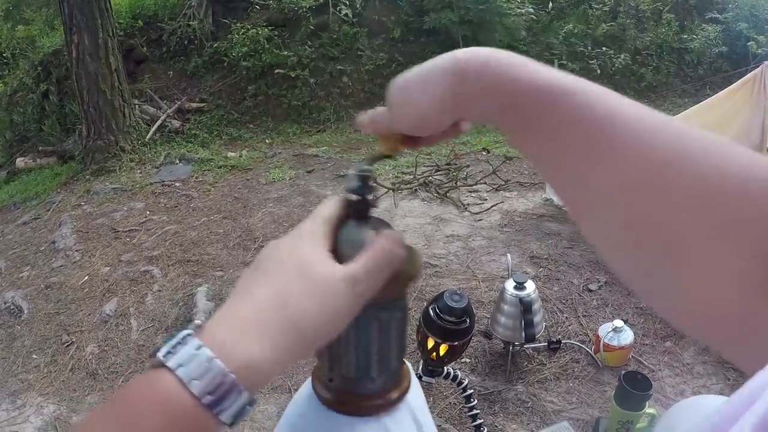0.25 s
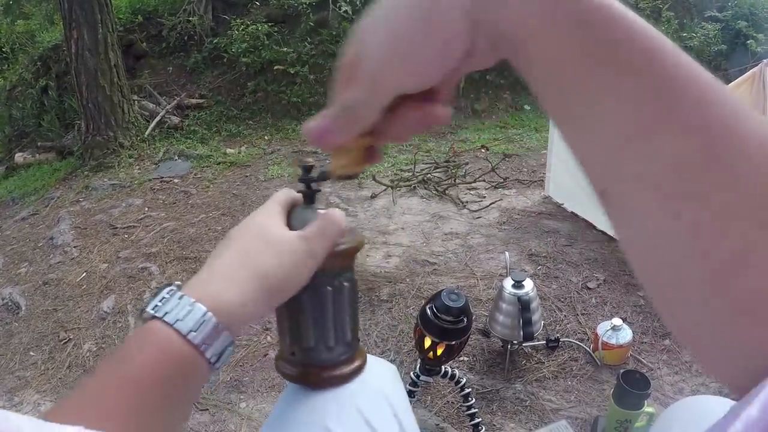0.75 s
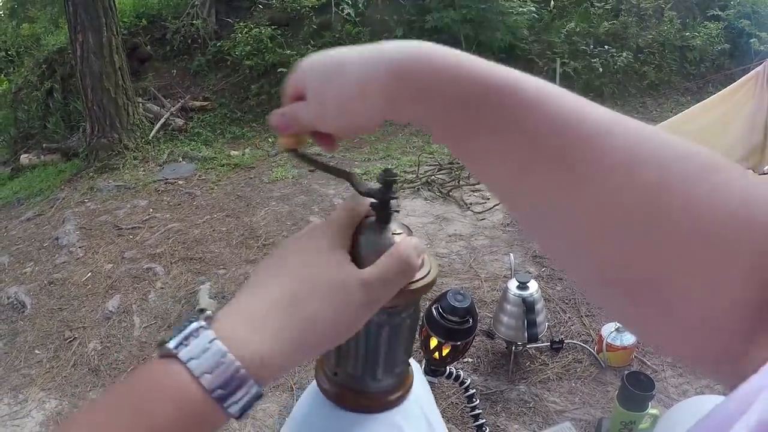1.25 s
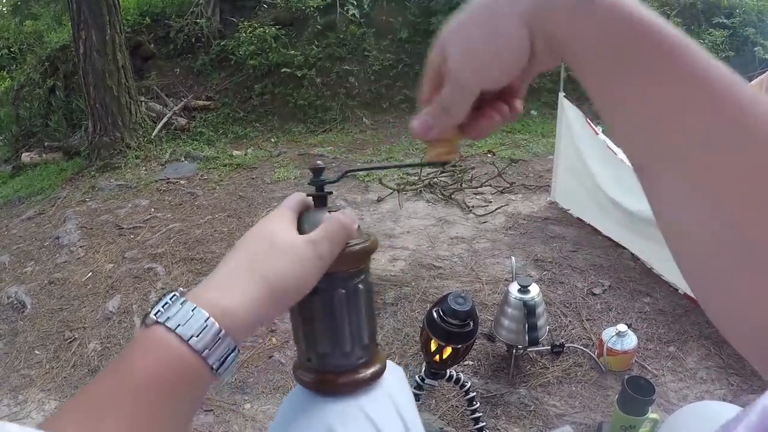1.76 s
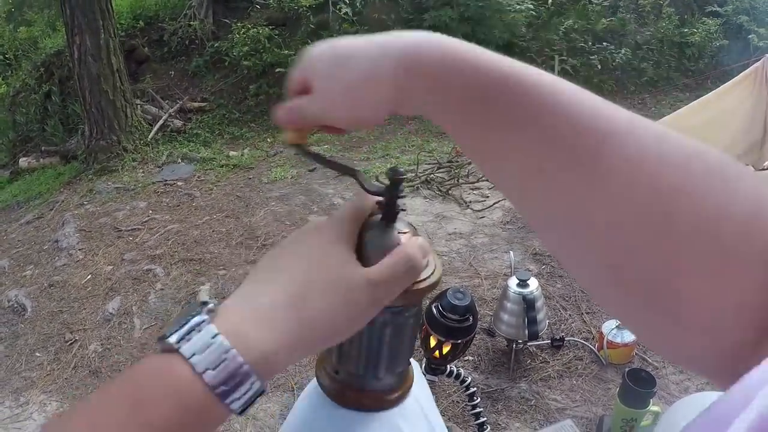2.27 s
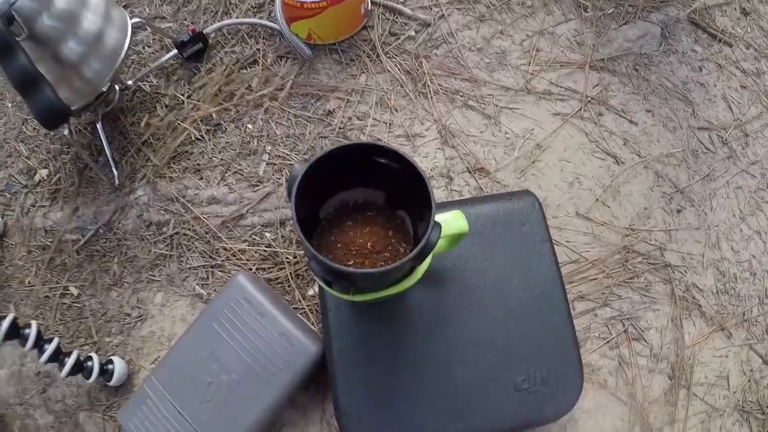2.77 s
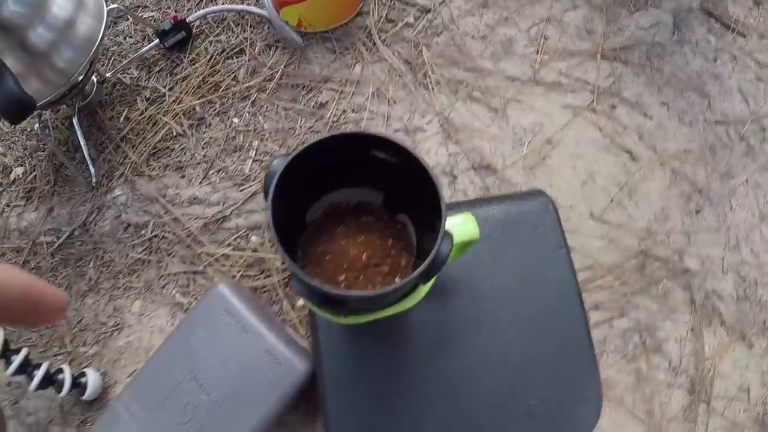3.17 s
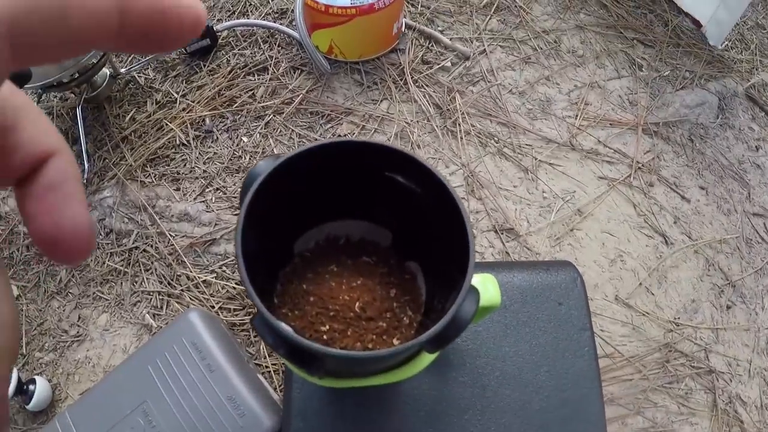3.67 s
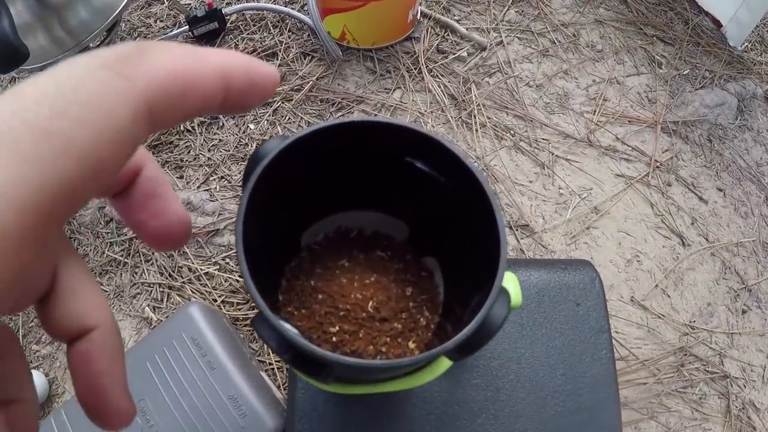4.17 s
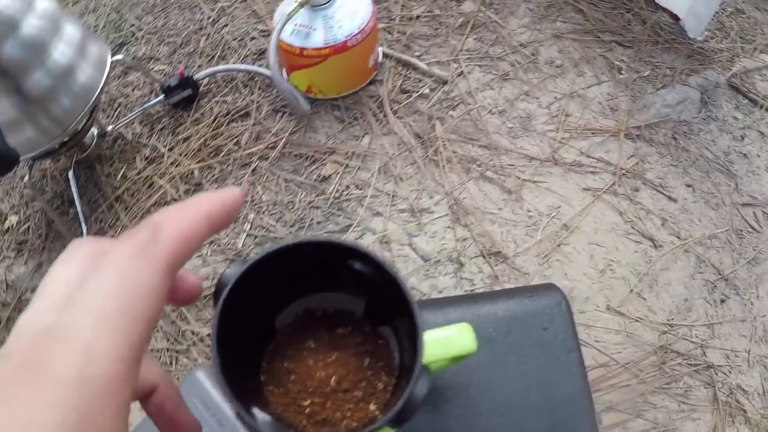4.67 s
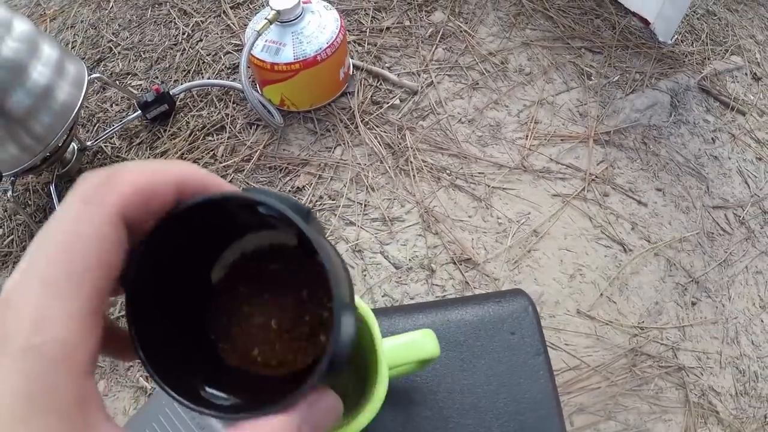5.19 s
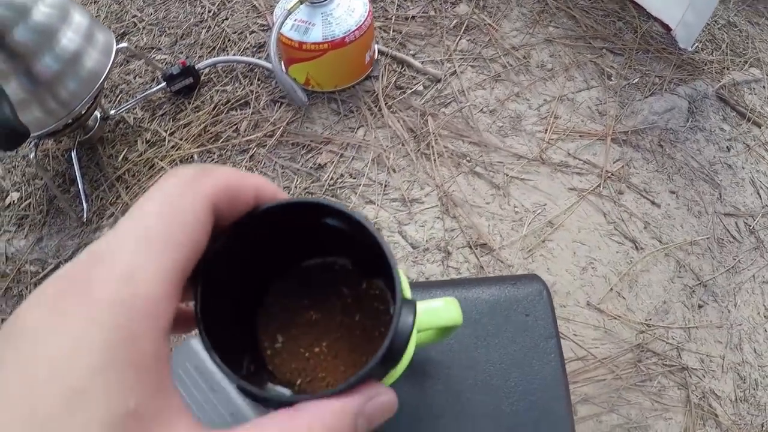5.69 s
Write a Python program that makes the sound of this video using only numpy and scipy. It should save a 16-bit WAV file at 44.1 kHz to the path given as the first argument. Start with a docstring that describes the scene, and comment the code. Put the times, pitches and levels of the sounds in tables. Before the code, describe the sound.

From 0 to 2.6 seconds a hand-cranked coffee mill works right at the microphone, loud and dry. Irregular crunching surges with the arm pushes; beans split in sharp cracks that ring the steel burrs around 3 kHz, with short rattling runs, gritty splinters, hollow mid-low booms and dull jolts from the base. A hard cut at 2.61 seconds leaves a far quieter forest camp: low wind thuds and flutter, strongest around 3.2 seconds, soft leaves and thin insect hiss. Dry clicks fall at 2.72, 3.13 and 3.6, with tiny falling bird whistles at 2.8 and 2.9 and fainter, breathier ones at 3.4 and 3.85. Wind fades after 4 seconds. Around 4.95-5.07 fingers tap a hollow plastic cup; a stronger knock lands at 5.81. Cicadas swell from 5 seconds, faint birds return at 5.3 and 5.7, and the almost mono image opens into wide stereo.

```python
"""A hand mill crunches coffee beans close by: noise snaps, cracks and chatter ring steel burrs and a hollow body.
At 2.609 s a hard cut to a quiet forest camp: wind thud and flutter, rushing leaves and insects, all shaped noise.
Over it: falling bird whistles, ticks of resonant noise, a plastic cup of decaying sines under the fingers.
The camp is mono but for the highest hiss; from 4.55 s a second microphone fades in and opens the stereo."""
import sys
import numpy as np
from scipy import signal
from scipy.fft import rfft, irfft, next_fast_len
from scipy.io import wavfile
from scipy.ndimage import uniform_filter1d, map_coordinates

SR = 44100
rng = np.random.default_rng(int(sys.argv[2]) if len(sys.argv) > 2 else 0)


def unload_wav(signal):
    """Save mono or channel-first audio to the path in sys.argv[1] as 16-bit WAV at rate SR, clipped to [-1, 1]."""
    wavfile.write(
        sys.argv[1],
        SR,
        np.round(np.clip(np.atleast_2d(signal).T, -1, 1) * 32767).astype(np.int16),
    )


N = 261935
TIME_S = np.arange(N) / SR
CUT_S = 2.609  # mill ends, camp begins
TOP_HZ = 15190  # band limit of the microphone chain

# All levels are relative: later gains and filters act on them.
# Noise spectra: f/Hz, density/dB
THUD_SPECTRUM = [(8.8, -37), (15, -2.5), (64, -0.5), (130, -6.5), (170, -68), (290, -120)]
FLUTTER_SPECTRUM = [(59, -10.5), (100, -7.5), (161, -7.5), (211, -12), (296, -16.5), (900, -34.5),
                    (1170, -77), (1980, -120)]
LEAF_SPECTRUM = [(350, 0), (600, -0.5), (1200, -7), (1850, -8.5), (2600, -14), (4000, -18), (6000, -45)]
HUSH_SPECTRUM = [(1200, -18), (2000, -3.5), (3300, -3), (5000, -4), (6300, -3), (7500, -18)]  # steady forest hush
CICADA_SPECTRUM = [(5500, -24), (7000, -6.5), (8500, 1), (10000, 0.5), (10800, -2), (11600, -27)]
HIGH_SPECTRUM = [(6470, -86), (11000, -5), (12300, -3), (13300, -5), (15000, -25)]  # highest insects
FAR_HISS_SPECTRUM = [(6000, -27), (8000, 1), (10400, 7.5), (11200, -1), (13400, -96), (14200, -50)]  # insects behind the mill
BODY_SPECTRUM = [(180, -39), (260, 0), (320, -1.5), (570, -1.5), (800, -1), (1100, -20), (1600, -18.5),
                 (2500, -49)]  # hollow mill body
BASE_SPECTRUM = [(25, -2), (60, -27), (112, -45), (135, -12.5), (150, -2.5), (185, -2), (240, 1),
                 (300, -17.5), (400, -49.5)]  # mill base on the knee
CRUNCH_SPECTRUM = [(600, -53), (1000, 8.5), (1400, -3.5), (1750, -7.5), (2080, -5), (2400, -10.5),
                   (2900, -34), (4000, -44)]
SNAP_SPECTRUM = [(900, -28), (1600, -2), (2500, 1), (4700, -5), (6500, -3), (8500, -10), (11000, -24),
                 (13500, -30)]  # dry click of a bean splitting

# Resonances: f/Hz, width/Hz, level/dB
SHELL_MODES = [(319.3, 115, 0.5), (446, 117, 0), (576, 81, 3.5), (725, 980, -1), (912, 78, 5)]  # hollow body, on top of its spectrum
BURR_MODES = [(2640, 250, -3.5), (2940, 280, -2), (2914, 65, -5), (3330, 540, -4), (3860, 720, 0.5),
              (4330, 750, -3.5)]  # steel burr
GRIT_MODES = [(5130, 84, 6.5), (6150, 430, 8.5), (7630, 99, -1)]  # upper burr modes

# Microphones
# left port against right for a near source: f/Hz, level/dB, phase/rad, likeness/0-1
LEFT_PORT = [(130, -1.2, 0.26, 0.99), (240, -2.5, -0.66, 1), (400, -5, -0.7, 0.97), (590, -15, -1, 0.99),
             (633, -31, -1.5, 0.95), (700, -27, -3.3, .6), (730, -22, 0, 0.9), (820, -12.5, -4, 1),
             (1140, -10.5, -4.5, 0.95), (1500, -0.5, -6, 0.93), (2060, 5, -6.5, 0.85),
             (2900, -1.8, -7, 0.82), (4100, 2.4, -5.5, 1), (5300, 8, -6.5, 0.55), (5880, 0.8, -6.5, 0.48),
             (6950, 3.5, -8.5, 1), (9000, -3, -8, 0.5), (13000, -6, -13, .3)]
# side noise against mid: f/Hz, level/dB
SIDE_WIDTH = [(60, -21), (110, -21), (200, -17.5), (370, -9), (690, 0.5), (1270, 6), (2340, -7),
              (4300, -20), (7920, 2), (14600, 2)]
# second microphone: t/s, share/0-1
STEREO = [(2.61, 0), (4.55, 0), (4.8, 0.4), (5.3, 1), (5.94, 1)]

# Camp levels: t/s, level/dB
WIND = [(2.62, -50), (2.75, -31.5), (3.2, -28), (3.75, -31), (3.95, -30.5), (4.14, -34.5), (4.8, -36.5),
        (5.33, -42), (5.5, -55)]  # thud on the port
RUSH = [(2.62, -46.5), (3.3, -44), (3.77, -51.5), (4.0, -53), (4.4, -53.5), (5.94, -55)]  # leaves
CHORUS = [(2.62, -57.5), (3.2, -57), (4.6, -55), (5.33, -44), (5.94, -43.5)]  # cicadas
HISS = [(2.62, -83), (2.9, -75), (3.2, -58), (3.5, -59.5), (4.6, -59.5), (4.8, -54.5), (5.94, -50.5)]  # highest insects
FLUTTER_DB, FLUTTER_FOLLOWS = -36, 0.12  # second: dB for each dB of thud
SOLO_S, SOLO_RISE_S, SOLO_DB = 4.98, 0.5, -46.5  # near cicada starts up and holds
RIPPLE_HZ, RIPPLE_DEPTH = 516, 0.25  # spacing and depth of bands in the chorus spectrum
CRICKET_DB, CRICKET_FADE_DB_PER_S = -60, 3  # fade runs from SOLO_S

# Camp events
# faint insect bands: t/s, length/s, f/Hz, width/Hz, level/dB
SONGS = [(2.6, 0.33, 8300, 400, -66), (2.79, .1, 7550, 250, -64), (3.04, .47, 11950, 600, -63),
         (2.78, .7, 1830, 90, -63)]
SONG_FADE_S = 0.033
# bird notes: t/s, length/s, start f/Hz, end f/Hz, level/dB, roughness/0-1
BIRD_NOTES = [(2.806, 0.02, 4100, 3680, -35, .04), (2.906, 0.021, 3920, 3600, -34, 0.08),
              (3.44, 0.085, 3970, 3420, -49.5, 0.95), (3.847, 0.27, 3580, 3350, -47.5, 0.5),
              (5.316, 0.085, 3700, 3400, -50.5, 0.95), (5.722, 0.2, 3600, 3330, -47, 0.65)]
BIRD_ECHO_DB, BIRD_ECHO_T60_S = -7, 0.4
# dry ticks and rustles of twigs and gear: t/s, level/dB, f/Hz, t60/s, width/Hz
TWIGS = [(2.7213, -11, 2200, 0.0085, 1820), (2.722, -20, 3480, 0.009, 1400),
         (2.7212, -23, 5900, 0.0072, 2500), (2.741, -42, 4500, .03, 600), (2.8002, -29, 700, 0.014, 900),
         (2.8012, -26, 1600, 0.03, 700), (2.8007, -30, 4800, 0.011, 3000), (3.125, -29.5, 1060, 0.034, 900),
         (3.1255, -38, 3000, .015, 4000), (3.137, -27.5, 1820, 0.021, 700), (3.1365, -33, 4900, 0.013, 600),
         (3.1374, -28, 3900, .018, 1200), (3.14, -33, 3250, 0.018, 500), (3.518, -45, 4500, .08, 4000),
         (3.58, -42, 4500, 0.11, 4000), (3.6016, -24.5, 980, 0.0312, 800), (3.6035, -15, 298, .013, 497),
         (3.678, -40, 3800, .08, 5000), (4.066, -40, 3600, .12, 5000), (4.268, -40.5, 4500, 0.21, 4500),
         (4.28, -42, 1500, 0.087, 1200), (4.295, -38, 3700, .035, 900), (4.38, -36, 700, 0.055, 1000),
         (4.473, -37.5, 1600, 0.031, 1600), (4.951, -38, 2480, 0.014, 3970),
         (5.073, -24.5, 2100, 0.0028, 2400)]
TICK_SNAP = 3.5  # front blow over the norm of the tick noise, at short t60
# fingers on the cup: t/s, level/dB, snap level/dB, main mode level/dB, rise constant/s
KNOCKS = [(4.954, -30.5, -21, 0, 0.0015), (4.998, -20, -40, -22, 0.0018), (5.0217, -27, -40, -4, 0.0018),
          (5.074, -29.5, -3.5, -2, 0.00024), (5.8115, -10, -23, 0, 0.00087)]
# cup modes, main one first: f/Hz, level/dB, t60/s
CUP_MODES = [(498, 6, 0.042), (373, -0.5, 0.043), (760, 4, 0.028), (852, -5.5, 0.052), (1260, -19, 0.022)]

# Mill motion
# arm pushes, crunch swells: t/s, level/dB
PUSHES = [(.09, 8.5), (.46, 7.5), (.77, 10), (1.12, 10), (1.47, 7.5), (1.82, 9), (2.0, 8), (2.14, 8),
          (2.5, 6.5)]
# base jolts on the knee: t/s, level/dB
JOLTS = [(.51, -0.5), (1.24, 10), (1.49, 4.5), (1.79, 6), (1.97, 10), (2.29, 3), (2.55, 3)]
# burrs run empty for a moment: t/s, level/dB
SLIPS = [(.545, -7), (.665, -3.5), (.87, -1.5), (.955, -2.5), (1.005, -4.5), (1.27, -0.5), (1.535, -3),
         (1.73, -10), (2.285, -1), (2.42, -2.5)]
PUSH_S, JOLT_S, SLIP_S = 0.068, 0.039, 0.028  # half width at 1/e of the dB swell
# load on the burrs: t/s, ring level/dB, strongest ring f/Hz, grit level/dB
BURR_LOAD = [(0.0, -37, 3120, -44), (0.21, -38.5, 2830, -38.5), (0.34, -36.5, 3260, -44),
             (0.46, -33.5, 3170, -39.5), (0.52, -33.5, 3300, -42), (0.57, -32, 2850, -34),
             (0.63, -42, 2950, -41.5), (0.69, -39.5, 2900, -42.5), (0.77, -40, 2900, -42.5),
             (0.82, -35, 2760, -43.5), (0.92, -37, 3080, -37.5), (1.06, -39, 3240, -43),
             (1.15, -34, 2900, -39.5), (1.3, -37, 3200, -40), (1.49, -38.5, 2960, -44),
             (1.59, -38.5, 3040, -44.5), (1.73, -35.5, 3080, -39.5), (1.85, -37, 3080, -42.5),
             (1.96, -35.5, 2940, -39.5), (2.0, -26, 3500, -38), (2.06, -34, 3440, -40),
             (2.18, -35, 3000, -42), (2.43, -33.5, 3300, -45), (2.45, -34, 3280, -45),
             (2.56, -40, 2940, -38), (2.6, -36.5, 3330, -47)]
# grip shifts as the crank goes round: t/s, body level/dB, strongest boom f/Hz
GRIP = [(0.0, -15.5, 425), (0.2, -20, 500), (0.22, -18.5, 431), (0.33, -18, 485), (0.41, -19, 420),
        (0.46, -14, 535), (0.49, -19, 344), (0.62, -16.5, 520), (0.69, -19, 493), (0.98, -15, 406),
        (1.04, -18, 504), (1.13, -16.5, 430), (1.17, -19.5, 513), (1.22, -18.5, 355), (1.37, -18, 490),
        (1.53, -16, 348), (1.6, -18.5, 445), (1.72, -16.5, 496), (1.75, -17, 390), (1.94, -15.5, 388),
        (1.98, -19.5, 507), (2.03, -15, 370), (2.14, -18, 480), (2.21, -20, 407), (2.24, -13.5, 366),
        (2.27, -23, 387), (2.29, -18.5, 460), (2.46, -17.5, 463), (2.53, -16.5, 373), (2.6, -17, 356)]
GRIP_DB_PER_OCTAVE = 7  # fall of a body mode away from that boom
CRUNCH_DB, KNEE_DB = -36, -28.5  # before swells
FAVOUR_DB = 2.5  # wander of each burr mode
CRACK_THUMP_DB = -9  # body drive of a crack
SNAP_DB, SNAP_CRACK_DB = -8.5, -12.5  # over the grit; against a crack

# Mill events
# beans that break loudly: t/s, level/dB, ring f/Hz, grit over ring/dB
CRACKS = [(0.0199, -40, 2980, -17), (0.0337, -26, 3180, -15), (0.048, -13, 3170, -9.5),
          (0.068, -17, 3130, -9), (0.13, -15, 3040, -4), (0.148, -13.5, 2940, -21), (0.166, -12, 2970, -30),
          (0.173, -16, 2970, -26), (0.2003, -22, 2900, -14), (0.2428, -19.5, 3000, 2),
          (0.276, -23, 3020, -18), (0.2902, -3.5, 3300, -17), (0.304, -11, 3320, -11),
          (0.308, -27, 3280, -14), (0.3384, -11.5, 3760, -19), (0.3505, -12, 3600, -20),
          (0.407, -16.5, 3430, -15), (0.421, -19, 3260, -3), (0.457, -13, 3460, -17),
          (0.493, -10, 3060, -8.5), (0.511, -10, 3310, -24), (0.5425, -26, 2940, -12),
          (0.576, -22, 3000, -2), (0.637, -22, 3020, -14), (0.692, -34, 3100, -13), (0.762, -24, 3000, -2),
          (0.838, -12, 2900, -11), (0.884, -17, 3200, -14), (0.899, -11, 3130, -5), (0.913, -19, 3020, 3),
          (0.935, -23, 3100, 8), (0.967, -32, 3000, -8), (1.035, -17, 3100, -15), (1.0475, -19, 3580, -16),
          (1.1355, -33, 2950, -12), (1.1578, -13.5, 2940, -18), (1.186, -12, 3210, -12),
          (1.204, -15, 2980, -16), (1.2316, -18, 2900, -20), (1.2527, -6, 3150, -10),
          (1.276, -27, 3430, -15), (1.2915, -12, 3500, -18), (1.3192, -10, 4080, -4.5),
          (1.3808, -15, 3630, -15), (1.4265, -27, 3000, -12), (1.448, -21, 2950, -16),
          (1.4985, -20, 2950, -8), (1.516, -22, 3830, -9), (1.539, -18.5, 2610, 0.5),
          (1.604, -10.5, 3300, -7), (1.662, -23, 3080, -15), (1.8438, -15, 2940, -11),
          (1.8905, -33, 2900, -16), (1.9047, -20, 2860, -19), (1.917, -19, 2920, -22),
          (1.935, -7.5, 3020, -18), (1.9522, -11, 2940, -26), (1.998, -12, 3440, -6),
          (2.0234, -12, 3400, -23), (2.043, -12, 3760, -15), (2.073, -14, 3740, -18),
          (2.088, -20, 3280, -18), (2.163, -23, 2940, -18), (2.1803, -21, 2870, -26),
          (2.2053, -14, 2920, -15), (2.22, -8, 3000, -23), (2.2446, -13, 3240, -23),
          (2.3072, -43, 3110, -12), (2.3248, -18, 3040, -5), (2.3444, -21, 3020, -14),
          (2.355, -15, 3000, -16), (2.4022, -14.5, 3920, -3), (2.4458, -18, 3150, -14),
          (2.478, -15, 3150, -4), (2.5048, -8, 2870, -6), (2.5302, -14, 2940, -9), (2.555, -7, 2940, -8),
          (2.584, -15, 2860, -17), (2.592, -11.5, 3260, -14)]
# runs of burr blows on a hard bean: t/s, length/s, rate/(1/s), ring f/Hz, level/dB
CHATTERS = [(0.03, 0.043, 140, 3190, -18), (0.145, 0.046, 127, 2940, -23), (0.881, 0.024, 160, 3070, -25),
            (1.154, 0.11, 135, 2930, -15), (1.193, 0.07, 136, 3480, -17), (1.272, 0.033, 150, 3450, -23),
            (1.415, 0.11, 130, 2910, -26), (1.891, 0.084, 202, 2900, -17), (1.989, 0.04, 150, 3450, -17),
            (2.024, 0.081, 140, 3690, -22), (2.159, 0.066, 166, 2980, -18.5),
            (2.322, 0.083, 130, 2880, -23.5), (2.462, 0.045, 200, 3100, -24),
            (2.568, 0.041, 170, 2950, -39)]
CHATTER_T60_S, CHATTER_SPREAD_DB = 0.012, 4
CHATTER_JITTER, CHATTER_DETUNE = 0.1307, 0.037  # spreads: share of a gap, share of pitch
# a bean gives way, the body booms once: t/s, level/dB, f/Hz
THUMPS = [(0.028, -10, 413), (0.14, -6, 527), (0.307, 3, 553), (0.411, -9, 410), (0.575, -8, 590),
          (0.695, -0.5, 414), (0.846, -5, 536), (0.963, -8, 318), (1.018, -9, 527), (1.23, -6, 353),
          (1.283, -2, 413), (1.347, 0.5, 563), (1.415, 0, 396), (1.519, -3.5, 312), (1.567, -4, 487),
          (1.609, -14, 498), (1.664, -5.5, 447), (1.869, -2, 420), (2.013, 0.5, 360), (2.067, -4, 534),
          (2.227, -6, 288), (2.322, -4, 417), (2.382, -10, 337), (2.506, -14, 318), (2.553, -15, 316)]
THUMP_T60_S, THUMP_RISE_S, THUMP_DB = 0.047, 0.0013, -2
# hard splinters ring only the upper burr modes: t/s, level/dB
SPLINTERS = [(0.0478, -21), (0.0902, -27), (0.1201, -22), (0.2004, -30), (0.2294, -21), (0.2548, -17),
             (0.2906, -21), (0.3386, -30), (0.385, -28), (0.405, -28), (0.4204, -23), (0.4549, -27),
             (0.4913, -23), (0.5756, -22), (0.629, -23), (0.759, -20), (0.8066, -31), (0.8385, -25),
             (0.8849, -27), (0.8984, -25), (0.9313, -19), (1.1568, -31), (1.1942, -22), (1.2321, -23),
             (1.2905, -26), (1.32, -19), (1.3793, -31), (1.5394, -20), (1.6023, -28), (1.8083, -23),
             (1.8427, -29), (1.935, -26), (1.9986, -19.5), (2.0433, -25), (2.2046, -24), (2.2842, -25),
             (2.3231, -25), (2.4024, -24), (2.4448, -26), (2.4698, -23), (2.4856, -15), (2.5047, -23),
             (2.5296, -24), (2.5541, -18), (2.585, -27)]
SPLINTER_T60_S, SPLINTER_DB = 0.014, -5.5


def amp(db):
    """Gain of a level in dB."""
    return 10 ** (np.asarray(db) / 20)


def unit(x):
    """x at rms 1."""
    return x / np.sqrt(np.mean(x ** 2) + 1e-20)


def along(points, hz, column=1):
    """One table column over frequency, on a log axis."""
    p = np.transpose(points)
    return np.interp(np.log(hz + 1), np.log(p[0] + 1), p[column])


def curves(rows):
    """One value per sample for each column after the time."""
    s, *cols = np.transpose(rows)
    return [np.interp(TIME_S, s, c) for c in cols]


def swells(rows, half_s):
    """Summed Gaussian dB swells around each (s, dB) row."""
    return sum(db * np.exp(-((TIME_S - s) / half_s) ** 2) for s, db in rows)


def wobble(rate_hz):
    """Smooth random curve, rate_hz knots a second."""
    knots = rng.standard_normal(int(N * rate_hz / SR) + 4)
    return map_coordinates(knots, [TIME_S * rate_hz])


def filtered(x, response):
    """x times a complex response of frequency."""
    m = next_fast_len(N + SR // 4)
    return irfft(rfft(x, m) * response(np.fft.rfftfreq(m, 1 / SR)), m)[..., :N]


def colour(spectrum):
    """Response that follows (Hz, dB) points."""
    return lambda hz: amp(along(spectrum, hz))


def modes(table):
    """Response of summed second-order resonances of alternating sign."""
    def response(f):
        return sum((-1) ** k * amp(db) * 1j * f * w / (c * c - f * f + 1j * f * w)
                   for k, (c, w, db) in enumerate(table))
    return response


def noise(response):
    """Two unrelated noises of one colour, rms 1 together."""
    return unit(filtered(rng.standard_normal((2, N)), response))


def bursts(times_s, gains, t60_s, size):
    """Envelope that swells over size / 2 samples at each time and dies away."""
    kicks = np.bincount(np.clip((times_s * SR).astype(int), 0, N - 1), gains, N)
    rise = np.hanning(size) / (size / 2)
    return signal.lfilter(rise, [1, -amp(-60 / (t60_s * SR))], kicks)


def near(pair):
    """Near source at both ports: the left hears it coloured, shifted and partly unlike."""
    def to_left(hz):
        shift = amp(along(LEFT_PORT, hz)) * np.exp(1j * along(LEFT_PORT, hz, column=2))
        alike = np.clip(along(LEFT_PORT, hz, column=3), 0, 1)
        return shift * np.array([alike, np.sqrt(1 - alike ** 2)])
    return np.array([filtered(pair, to_left).sum(0), pair[0]])


def wind():
    """Wind buffets the port: lumpy low thud, and a flutter that weakly follows it."""
    thud_db = curves(WIND)[0]
    thud = amp(thud_db + 0.76 * wobble(35) + 0.6 * wobble(8)) * noise(colour(THUD_SPECTRUM))
    flutter_db = FLUTTER_DB + FLUTTER_FOLLOWS * (thud_db - np.transpose(WIND)[1].mean())
    return thud + amp(flutter_db + 0.41 * wobble(13)) * noise(colour(FLUTTER_SPECTRUM))


def far_drone():
    """Low resonant noise that grows in as the stereo opens."""
    band = modes([(172.0, 68, 0)])
    level_db = -41.5 + 14.6 * (TIME_S - 5.5) + 0.93 * wobble(15)
    return curves(STEREO)[0] * amp(level_db) * noise(lambda f: band(f) ** 2)


def leaves():
    """Rushing leaves over a steady forest hush, both broadband noise."""
    rush = amp(curves(RUSH)[0] + 1.1 * wobble(10.0)) * noise(colour(LEAF_SPECTRUM))
    return rush + amp(-58.5) * noise(colour(HUSH_SPECTRUM))


def cicadas():
    """Chorus noise with a rippled spectrum, and a near cicada as resonant noise that swells in."""
    def banded(f):
        return colour(CICADA_SPECTRUM)(f) * (1 + RIPPLE_DEPTH * np.cos(2 * np.pi * f / RIPPLE_HZ))
    chorus = amp(curves(CHORUS)[0] + 0.52 * wobble(32)) * noise(banded)
    song = modes([(7490, 230, -3), (8250, 320, -3.0), (7180, 990, -4.0)])
    swell = np.clip((TIME_S - SOLO_S) / SOLO_RISE_S, 0, 1) ** 1.7
    return chorus + swell * amp(SOLO_DB + 1.1 * wobble(35)) * noise(lambda f: song(f) ** 2)


def crickets():
    """Fluctuating narrow-band noise that fades under the near cicada."""
    trill = modes([(4500, 510, 0)])
    fade_db = CRICKET_FADE_DB_PER_S * np.maximum(TIME_S - SOLO_S, 0)
    level_db = CRICKET_DB - fade_db + 1.8 * wobble(40) + 1.8 * wobble(10)
    return amp(level_db) * noise(lambda f: trill(f) ** 2)


def thin_song():
    """Faint narrow insect bands that fade in, hold and fade out."""
    out = np.zeros(N)
    for s, length_s, hz, width_hz, db in SONGS:
        band = modes([(hz, width_hz, 0)])
        shape = np.clip(np.minimum(TIME_S - s, s + length_s - TIME_S) / SONG_FADE_S, 0, 1)
        out = out + amp(db + 2.2 * wobble(30)) * shape * noise(lambda f: band(f) ** 2)[0]
    return out


def high_insects():
    """Highest hiss, unlike noise in each ear and stronger on the right."""
    return amp(curves(HISS)[0]) * noise(colour(HIGH_SPECTRUM)) * [[0.75], [1.2]]


def birds():
    """Short falling whistles, smeared by distance into a breathy band; the trees answer."""
    out = np.zeros(N + SR)
    for s, length_s, from_hz, to_hz, db, rough in BIRD_NOTES:
        u = np.arange(int(length_s * SR)) / (length_s * SR)
        phase = 2 * np.pi * np.cumsum(to_hz + (from_hz - to_hz) * (1 - u) ** 1.6) / SR
        smear = rough * np.array([wobble(420)[:len(u)], wobble(416)[:len(u)]])
        tone = (1 - rough + smear[0]) * np.sin(phase) + smear[1] * np.cos(phase)
        shape = np.minimum(u * length_s / 0.0073, 1) * (1 - u) / (1 + 1.8 * u)
        out[round(s * SR):][:len(u)] += amp(db) * shape * tone
    t = TIME_S[:SR // 2]
    echo = unit(amp(-60 * t / BIRD_ECHO_T60_S) * rng.standard_normal(len(t))) / np.sqrt(len(t))
    return (out + amp(BIRD_ECHO_DB) * signal.fftconvolve(out, echo)[:len(out)])[:N]


def ticks():
    """A decaying crack of noise with a sharp front, each through one broad resonance."""
    out, t = np.zeros(N + SR), np.arange(8192) / SR
    f = np.fft.rfftfreq(len(t), 1 / SR)
    for s, db, hz, t60_s, width_hz in TWIGS:
        rise = 1 - np.exp(-t / (t60_s * t60_s))  # longer ticks start softer
        crack = amp(-60 * t / max(t60_s, 0.004)) * rise * rng.standard_normal(len(t))
        crack[round(t60_s * t60_s * SR)] += TICK_SNAP * np.linalg.norm(crack) * min(0.0075 / t60_s, 1)
        crack = irfft(rfft(crack) * modes([(hz, width_hz, 0)])(f) ** 3 / (1 + 1j * f / 6000) ** 2)
        size = np.sqrt(np.sum(crack ** 2) / (t60_s * SR / 14))
        out[round(s * SR):][:len(t)] += amp(db) * crack / size / 2
    return out[:N]


def cup():
    """Each touch rings the hollow plastic, thuds and snaps: decaying sines."""
    out, t = np.zeros(N + SR), np.arange(SR // 10) / SR
    for s, db, snap_db, main_db, rise_s in KNOCKS:
        ring = 0
        for k, (hz, level_db, t60_s) in enumerate(CUP_MODES):
            mode_db = level_db + (main_db if k == 0 else 0)
            ring = ring + amp(mode_db - 60 * t / t60_s) * np.sin(2 * np.pi * hz * t)
        snap = amp(snap_db - 60 * t / 0.029) * np.sin(2 * np.pi * 2200 * t)
        thud = 3 * amp(-60 * t / 0.019) * np.sin(2 * np.pi * 650 * t)
        rise = (1 - np.exp(-t / max(rise_s, 0.0002))) ** 2
        out[round(s * SR):][:len(t)] += amp(db - 4.5) * (ring + snap + thud) * rise
    return out[:N]


def camp():
    """Mid air plus a side that fades in; close sounds go over to the two-port pickup."""
    stereo = curves(STEREO)[0]
    mid, other = wind() + far_drone() + leaves() + cicadas() + crickets()
    side = stereo * filtered(1.03 * other - 0.19 * mid, colour(SIDE_WIDTH))
    mono = ticks() + cup()
    two_port = amp(4.0) * near(np.array([mono, 0 * mono]))
    close = mono + stereo * (two_port - mono)
    return np.array([mid + side, mid - side]) + close + birds() + high_insects() + thin_song()


def splinters():
    """A short gritty noise burst each, through the upper modes of the burr."""
    at_s, db = np.transpose(SPLINTERS)

    def band(f):
        return modes(GRIT_MODES)(f) / (1 + (f / 7500) ** 10) / (1 + (4500 / (f + 1)) ** 8)
    return noise(band) * bursts(at_s, amp(db + SPLINTER_DB), SPLINTER_T60_S, size=60)


def thumps():
    """One short boom of the hollow body each, a decaying sine."""
    out, t = np.zeros(N + SR), np.arange(SR // 20) / SR
    for s, db, hz in THUMPS:
        shape = amp(db + THUMP_DB - 60 * t / THUMP_T60_S) * (1 - np.exp(-t / THUMP_RISE_S))
        out[round(s * SR):][:len(t)] += shape * np.sin(2 * np.pi * hz * t)
    return out[:N] * [[1], [0.3]]


def chatter():
    """Each blow of a run rings the burr for a few milliseconds; the run swells and breaks off."""
    out, t = np.zeros((2, N + SR)), np.arange(SR // 40) / SR
    ring = amp(-60 * t / CHATTER_T60_S) * (1 - np.exp(-t / 0.00023))
    for s, length_s, rate_hz, hz, db in CHATTERS:
        chance = rng.standard_normal((24, 4))
        for k in range(int(length_s * rate_hz) + 1):
            detune, turn, spread, jitter = chance[k]
            u = (k + 0.5) / (length_s * rate_hz + 1)
            offset_rad = np.array([[0], [2.4 * turn]])
            phase = 2 * np.pi * hz * (1 + CHATTER_DETUNE * detune) * t + offset_rad
            size = amp(db + CHATTER_SPREAD_DB * spread) * np.sin(np.pi * u ** 2.0) ** 0.28
            start = round((s + (k + CHATTER_JITTER * jitter) / rate_hz) * SR)
            out[:, start:start + len(t)] += size * ring * np.sin(phase)
    return out[:, :N]


def grinding():
    """Bean fragments snap between the burrs; each snap rings the steel and shakes the body."""
    ring_db, centre_hz, grit_db = curves(BURR_LOAD)
    slip_db = swells(SLIPS, SLIP_S)
    ring_db, grit_db = ring_db + slip_db, grit_db + slip_db
    crunch_db = CRUNCH_DB + swells(PUSHES, PUSH_S) + slip_db + 1.4 * wobble(14)
    knee_db = KNEE_DB + swells(JOLTS, JOLT_S) + 3.4 * wobble(9.0)
    body_db, boom_hz = curves(GRIP)
    body_db = body_db + 0.22 * wobble(11.9)
    chance = rng.random((1300, 2))
    snap_s = chance[:, 0] * CUT_S
    sizes = np.minimum((1 - chance[:, 1]) ** -0.45, 3.2)  # many small fragments, few large
    at_s, db, crack_hz, bright_db = np.transpose(CRACKS)

    def layer(response, level_db, smooth, crack_db, spread_db, size=140):
        """Steady rubbing plus snaps, then the loud cracks, through one part of the mill."""
        gains = sizes * amp(spread_db * rng.standard_normal(len(sizes)))
        snaps = bursts(snap_s, gains, t60_s=0.0053, size=size)
        snaps = snaps / np.sqrt(np.abs(uniform_filter1d(snaps ** 2, size=SR // 8)) + 1e-6)
        drive = rng.standard_normal((2, N))
        norm = np.sqrt(np.mean(np.abs(response(np.linspace(0, SR / 2, num=8192))) ** 2))
        cracks = bursts(at_s - size / SR / 2, amp(crack_db), t60_s=0.0094, size=size)
        envelope = amp(level_db) * (smooth + snaps) / (1 + smooth) + cracks
        return filtered(drive * envelope, response) / norm

    def grit(f):
        return modes(GRIT_MODES)(f) * f / 6000 / (1 + (f / 8300) ** 10)

    parts = layer(colour(BASE_SPECTRUM), knee_db, 0.53, db - 28, spread_db=2.5)
    parts = parts + layer(colour(CRUNCH_SPECTRUM), crunch_db, 0.91, db - 32, spread_db=0.5)
    parts = parts + layer(grit, grit_db + 2.1 * wobble(14.58), 0.63, db + bright_db - 9.5, spread_db=0.0)
    parts = parts + layer(colour(SNAP_SPECTRUM), grit_db + SNAP_DB + 4.5 * wobble(24.15), 0.02,
                          db + bright_db / 2 + SNAP_CRACK_DB, spread_db=0.5, size=24)
    body = colour(BODY_SPECTRUM)
    for hz, width_hz, mode_db in SHELL_MODES:  # grip shifts: each body mode surges on its own
        mode = modes([(hz, width_hz, 0)])
        tilt_db = along(BODY_SPECTRUM, hz)
        share_db = mode_db + tilt_db + 0.95 * wobble(15) + 1.3
        share_db = share_db - GRIP_DB_PER_OCTAVE * np.abs(np.log2(hz / boom_hz))
        parts = parts + layer(lambda f: mode(f) * body(f), body_db + share_db, 1.93,
                              db + CRACK_THUMP_DB + tilt_db, spread_db=1.0)
    for hz, width_hz, mode_db in BURR_MODES:  # a crack rings the modes near its pitch
        mode = modes([(hz, width_hz, 0)])
        off_db = -np.minimum(np.abs(crack_hz - hz) / 30, 14)
        level_db = ring_db + mode_db - np.abs(centre_hz - hz) / 110 + FAVOUR_DB * wobble(11.98)
        parts = parts + layer(lambda f: mode(f) / (1 + (f / 6000) ** 5) / (1 + ((f - hz) / 900) ** 2),
                              level_db, 0.61, db + off_db - 5.0, spread_db=1)
    return parts


def mill():
    """All mill parts at the two ports over far insects, peaks rounded off, then band-limited."""
    far_hiss = amp(-51.5) * noise(colour(FAR_HISS_SPECTRUM)) * [[0.55], [1.15]]
    heard = near(grinding() + chatter() + thumps() + splinters()) + far_hiss
    heard = heard / (1 + np.abs(heard / 0.95) ** 4) ** (1 / 4)

    def band(hz):
        return (hz / 100) ** 3 / (1 + (hz / 100) ** 3) / (1 + (hz / 13500) ** 40)
    return filtered(heard, band)


def scene():
    """The mill, a hard cut, the camp."""
    after = np.clip((TIME_S - CUT_S) / 0.00091, 0, 1)
    return (1 - after) * mill() + after * camp()


def record(dry):
    """Nothing passes above the band limit."""
    return filtered(dry, lambda hz: hz < TOP_HZ)


dry = scene()
out = record(dry)
unload_wav(out)
```